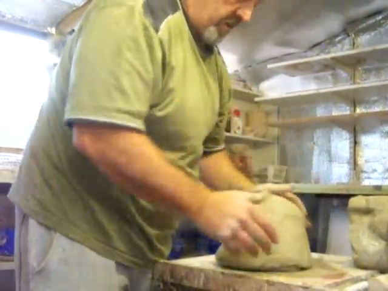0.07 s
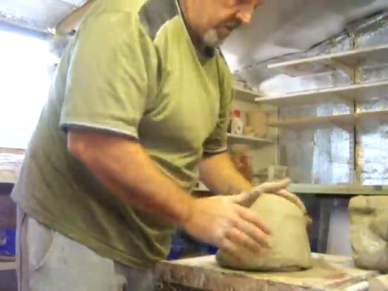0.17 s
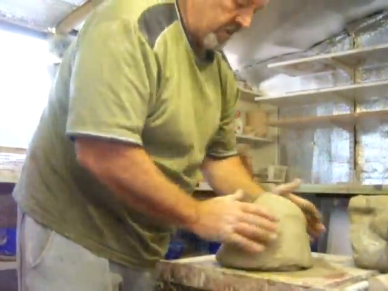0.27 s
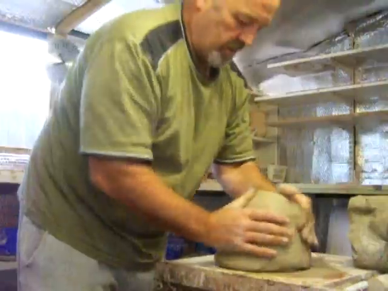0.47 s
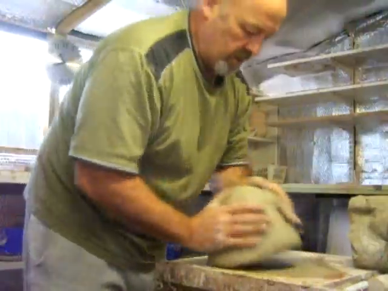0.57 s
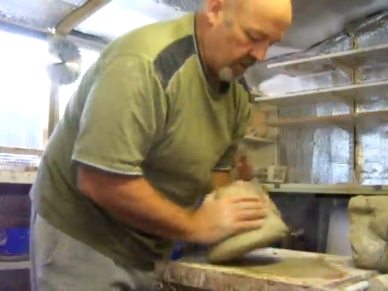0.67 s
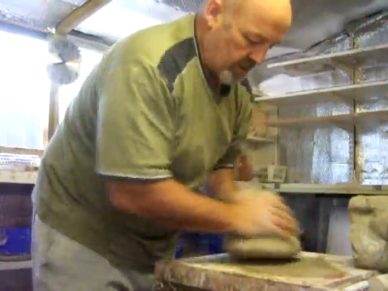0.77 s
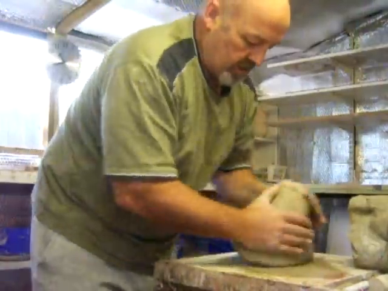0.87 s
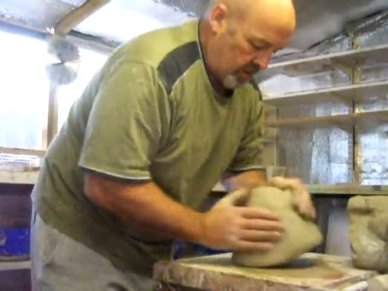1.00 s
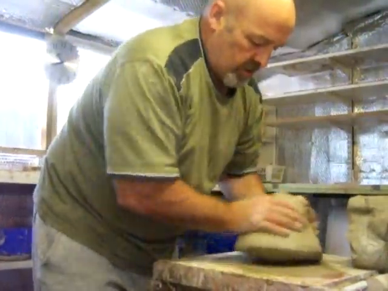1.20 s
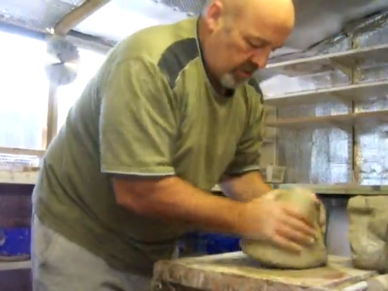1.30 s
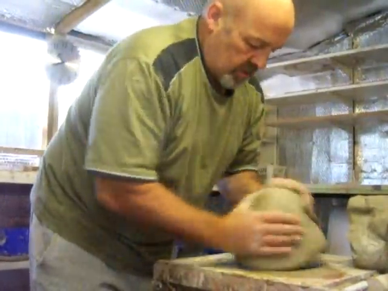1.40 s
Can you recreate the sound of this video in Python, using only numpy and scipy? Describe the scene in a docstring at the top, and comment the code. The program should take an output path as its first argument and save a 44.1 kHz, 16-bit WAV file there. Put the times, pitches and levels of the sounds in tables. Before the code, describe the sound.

Wet clay lands with a dull, booming thump on a workbench and flops over, with sticky ticks and palm pats. It is then rocked, making the loose top knock again, over the faint rumble of a small room.

```python
"""A heavy lump of wet clay is slammed onto a wooden bench in a small workshop, then worked by hand.
Over low rumble and faint hiss, the lump lands and flops over: the impact thumps, sets the bench's
modes booming, and the clay squelches and smears. Thuds and knocks of the loose bench top follow as
the weight settles, while palms pat and rub the clay and its sticky skin ticks as it lets go. After a
short lull the lump is rocked, and the bench sways and knocks again under more pats and rubs."""
import sys
import numpy as np
from scipy import signal
from scipy.fft import rfft, irfft
from scipy.io import wavfile
from scipy.ndimage import uniform_filter1d

SR = 44100
rng = np.random.default_rng(int(sys.argv[2]) if len(sys.argv) > 2 else 0)


def int16_out(signal):
    """Quantize to a 16-bit WAV file."""
    q = np.round(np.clip(np.atleast_2d(signal).T, -1, 1) * 32767)
    wavfile.write(sys.argv[1], SR, q.astype(np.int16))


N = 63945
T = np.arange(N) / SR


def amp(db):
    """Decibels to amplitude ratio."""
    return 10 ** (np.asarray(db) / 20)


def unit_rms(x):
    """Normalisation to an rms of 1."""
    return x / np.sqrt(np.mean(x ** 2) + 1e-20)


def curve_at(points, hz):
    """Interpolation on a logarithmic frequency axis."""
    points_hz, values = np.transpose(points)
    return np.interp(np.log(hz + 1), np.log(points_hz + 1), values)


def since(start):
    """Seconds since start, zero before it."""
    return np.maximum(T - start, 0)


def swell(t, rise_s, shape):
    """Gamma envelope: peaks at 1 after rise_s; a higher shape makes it narrower."""
    u = t / rise_s
    return (u * np.exp(1 - u)) ** shape


def strike(t, rise_s, t60_s):
    """Free decay: a linear onset times an exponential that falls 60 dB in t60_s."""
    return np.minimum(t / rise_s, 1) * np.exp(-np.log(1000) * t / t60_s)


def mode(t, hz, rise_s, t60_s):
    """Normal mode: a sinusoid in free decay."""
    return strike(t, rise_s, t60_s) * np.sin(2 * np.pi * hz * t)


def pulse(start, hz, rise_cycles, shape):
    """Heavily damped resonance: a sinusoid that lasts a few cycles."""
    t = since(start)
    return swell(t, rise_cycles / hz, shape) * np.sin(2 * np.pi * hz * t)


def noise(spectrum, grain=0, tilt_db=0):
    """Filtered noise; grain is random amplitude modulation that clumps it into millisecond crackles."""
    hz = np.fft.rfftfreq(N, 1 / SR)
    white, clumps = rng.standard_normal((2, N))
    grainy = white * np.exp(grain * unit_rms(uniform_filter1d(clumps, size=40)))
    gain_db = curve_at(spectrum, hz) + tilt_db * np.log2(np.maximum(hz, 200))
    return unit_rms(irfft(rfft(grainy) * amp(gain_db), N))


# the workshop's background spectrum: frequency_hz, level_db
BACKGROUND_SPECTRUM = [(12, -15), (25, 3.5), (65, -1), (130, -7), (270, -14.5), (500, -21), (1100, -24.5),
                       (2400, -34.5), (4500, -38), (6000, -37.5), (7500, -37), (8500, -50)]
def background():
    """Stationary noise: low rumble and faint hiss."""
    return amp(-43) * noise(BACKGROUND_SPECTRUM)


# the workshop's reverberation times: frequency_hz, t60_s
ROOM_DECAY = [(60, 0.29), (200, 0.66), (500, 0.47), (1200, 0.46), (3000, 0.3), (8000, 0.4)]
def reverberation(x):
    """Diffuse field: dense reflections, each band dying away at its own rate."""
    reflections = rng.choice([-1., 1.], N) * (rng.random(N) < 3000 / SR) * (T > .006)
    hz, t, bands = signal.stft(reflections, SR, nperseg=256)
    decay = np.exp(-np.log(1000) * t / curve_at(ROOM_DECAY, hz)[:, None])
    tail = signal.istft(bands * decay, SR, nperseg=256)[1]
    return signal.fftconvolve(x, tail / np.linalg.norm(tail))[:N]


# the weight comes down: start_s, level_db
SWAYS = [(0.136, -23), (0.99, -34)]
def sway():
    """Free vibration: bench and floor oscillate slowly after each loading."""
    return sum(amp(db) * mode(since(start), hz=18.4, rise_s=0.1, t60_s=1.3) for start, db in SWAYS)


# clay rubs and smears, under the hands or as it spreads on the bench:
# start_s, length_s, level_db, tilt_db_per_octave
RUBS = [(-0.05, .19, -46, 0.5), (0.12, 0.042, -31, 1), (0.196, 0.029, -38.5, 0.5),
        (0.223, 0.084, -33.5, -4), (0.267, 0.033, -39, 2.5), (0.317, 0.0074, -39, 0),
        (0.329, 0.0089, -39.5, 1), (0.507, 0.033, -43.5, 3.5), (0.899, 0.023, -37.5, -1),
        (0.919, 0.029, -43, -2.5), (0.981, 0.061, -42, -3), (1.051, 0.023, -39, 1.5),
        (1.148, 0.016, -43.5, 0.5), (1.205, .014, -44, 3), (1.301, 0.091, -50, 6),
        (1.336, 0.037, -39.5, -3), (1.406, 0.05, -45.5, 0.5)]
# spectrum of the sliding: frequency_hz, level_db
RUB_SPECTRUM = [(80, -9), (300, 7), (600, -2.5), (1400, -2.5), (2500, -15.5), (3600, -17.5), (4600, -27.5),
                (6000, -26), (8500, -41)]
def rubs():
    """Sliding friction: grainy noise rises and falls with each slide."""
    out = np.zeros(N)
    for start, length, db, tilt_db in RUBS:
        slide = np.sin(np.pi * np.minimum(since(start) / length, 1))
        out += amp(db) * slide * noise(RUB_SPECTRUM, grain=0.43, tilt_db=tilt_db)
    return out


# sticky clay lets go: start_s, level_db
TICKS = [(0.2016, -61), (0.2697, -32.5), (0.2768, -36), (1.0600, -45.5), (1.434, -40)]
# spectrum of the release: frequency_hz, level_db
TICK_SPECTRUM = [(200, 0), (900, -9.5), (1800, 7), (3000, 1.5), (4600, -5.5), (6300, 1), (8500, -15.5)]
def ticks():
    """Adhesive release: the clay's skin parts in a brief, bright burst of noise."""
    return sum(amp(db) * strike(since(start), rise_s=0.00078, t60_s=0.031) * noise(TICK_SPECTRUM)
               for start, db in TICKS)


# clay slaps palm or bench: start_s, smack_db, pocket_db, pocket_hz
PATS = [(0.1300, -49, -22, 2170), (0.1945, -40, -26, 1400), (0.2015, -29, -23, 520),
        (0.2790, -54, -29.5, 485), (0.2875, -35, -29.5, 585), (0.443, -44.5, -45.5, 500),
        (0.5190, -39.5, -39.5, 452), (0.5756, -46.5, -38.5, 488), (1.0595, -31.5, -26, 537),
        (1.2071, -40.5, -32.5, 450), (1.2095, -47, -39.5, 3780)]
# spectrum of the smack: frequency_hz, level_db
SMACK_SPECTRUM = [(200, 4.5), (500, -7.5), (800, -5.5), (1150, -17.5), (1500, 5), (1800, -6), (2100, -5),
                  (2700, -17.5), (3800, -13.5), (4600, -34.5), (5800, -21), (8500, -36.5)]
def pats():
    """Cavity resonance: each smack traps a pocket of air, which rings about a millisecond later."""
    out = np.zeros(N)
    for start, smack_db, pocket_db, hz in PATS:
        out += amp(smack_db) * swell(since(start), rise_s=0.0014, shape=0.74) * noise(SMACK_SPECTRUM)
        out -= amp(pocket_db) * pulse(start + 0.000966, hz, rise_cycles=1.63, shape=1.42)
    return out


# the loose bench top knocks: start_s, level_db, pitch_hz
KNOCKS = [(0.0275, -33, 910), (0.1193, -24.5, 1077), (0.1573, -24.5, 808), (0.1773, -28, 762),
          (0.1922, -22.5, 876), (0.3497, -31, 630), (0.3991, -32, 526), (0.4607, -33.5, 595),
          (0.9736, -25, 730), (1.0026, -22.5, 720), (1.0425, -37.5, 453), (1.1523, -29, 723),
          (1.3698, -24.5, 717), (1.4031, -26.5, 720)]
# duller returns from nearby surfaces: delay_s, gain_db, pitch_ratio
EARLY_REFLECTIONS = [(.0024, -4, 0.734), (.0068, -7.5, 0.58), (.0102, -16, 0.83), (.0182, -16, 0.75)]
def knocks():
    """Damped resonance of wood: each hollow knock is followed by its early reflections."""
    out = np.zeros(N)
    direct_path = (0, 0, 1)
    for start, db, hz in KNOCKS:
        for delay, gain_db, ratio in [direct_path, *EARLY_REFLECTIONS]:
            out += amp(db + gain_db) * pulse(start + delay, hz * ratio, rise_cycles=1.77, shape=6.1)
    return out


# the weight settles on the bench: start_s, level_db, pitch_hz
THUDS = [(0.1186, -24, 261.6), (0.1477, -17, 302), (0.163, -14, 126.6), (0.1749, -21, 260),
         (0.192, -20, 156), (0.214, -26.5, 50.7), (0.2580, -29, 250), (0.3330, -31, 270),
         (0.574, -33.5, 53.5), (0.917, -35, 111.1), (0.9690, -29.5, 50.85), (1.066, -37.5, 41),
         (1.159, -32, 236), (1.341, -31, 265), (1.371, -33.5, 97)]
def thuds():
    """Soft impacts: each slow contact gives a dull, low pulse."""
    return -sum(amp(db) * pulse(start, hz, rise_cycles=0.96, shape=3.84) for start, db, hz in THUDS)


# the lump lands, then flops over: start_s, thump_db, ring_db, squelch_db
SLAMS = [(0.1220, -9.5, -27.5, -25.5), (0.189, -18.5, -42.5, -35.5)]
# modes of the loaded bench: frequency_hz, level_db, t60_s
BENCH_MODES = [(88.6, -7.5, 0.1), (142.1, 4, 0.51), (186, 3.5, 0.2), (249.8, -0.5, 0.52), (299, 3.5, 0.17),
               (435, -9.5, .6), (612.5, -10, 0.95), (808, -24.5, 0.45), (840, -15, 0.25), (1065, -12, .25)]
# spectrum of spreading clay: frequency_hz, level_db
SQUELCH_SPECTRUM = [(60, -11), (150, -4), (280, -5.5), (450, 6.5), (700, 0), (1400, -8), (1850, -9),
                    (2260, -13), (2900, -15), (4600, -26.5), (5700, -23), (8500, -40.5)]
def slams():
    """Inelastic impact: the lump thumps, excites the bench's modes and squelches as it spreads."""
    thump, ring, squelch = np.zeros((3, N))
    for start, thump_db, ring_db, squelch_db in SLAMS:
        thump += amp(thump_db) * pulse(start, hz=103, rise_cycles=1, shape=1.82)
        for hz, db, t60_s in BENCH_MODES:
            ring += amp(ring_db + db) * mode(since(start), hz, rise_s=0.012, t60_s=t60_s)
        spreading = strike(since(start - 0.009), rise_s=0.013, t60_s=0.26)  # just ahead of the thump
        squelch += amp(squelch_db) * spreading * noise(SQUELCH_SPECTRUM, grain=0.49)
    return thump, ring, squelch


def scene():
    """Superposition: direct sound, reverberation and background add at one microphone."""
    thump, ring, squelch = slams()
    impacts = thump + thuds()
    lump = impacts + ring + squelch
    lump += reverberation(amp(-4) * (ring + squelch) + amp(-13.5) * impacts)
    bench_top = knocks()
    bench_top += amp(-10) * reverberation(bench_top)
    clay_skin = pats() + ticks() + rubs()
    clay_skin += amp(-9.5) * reverberation(clay_skin)
    return (background() + sway() + clay_skin + bench_top + lump)[None]


def record(dry):
    """Band limiting: a steep low-pass filter removes the highest treble."""
    cutoff_hz = 8500
    lowpass = signal.firwin(301, cutoff_hz, window=("kaiser", 8), fs=SR)
    return signal.oaconvolve(dry, lowpass[None], "same")


dry = scene()
out = record(dry)
int16_out(out)
```